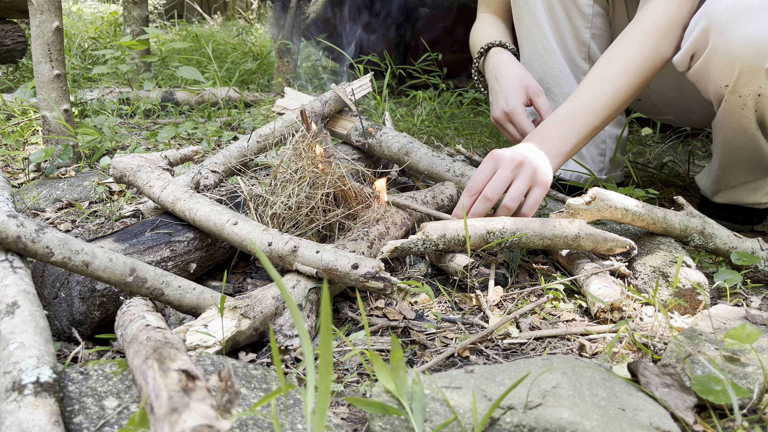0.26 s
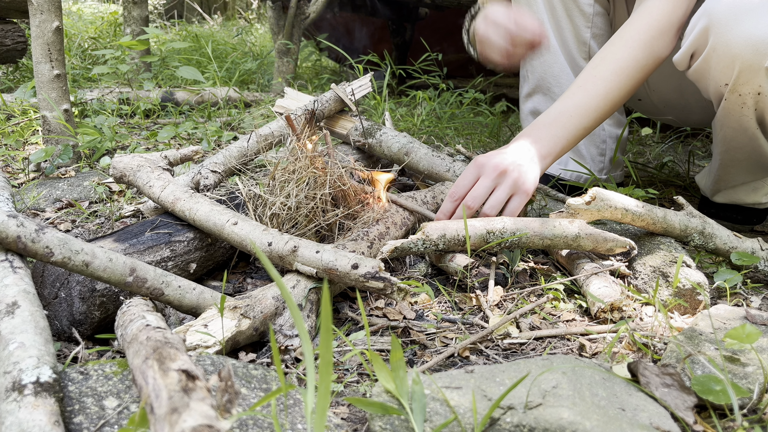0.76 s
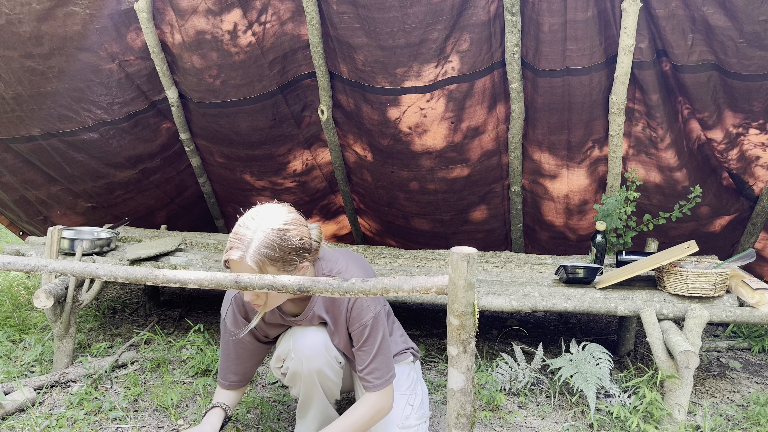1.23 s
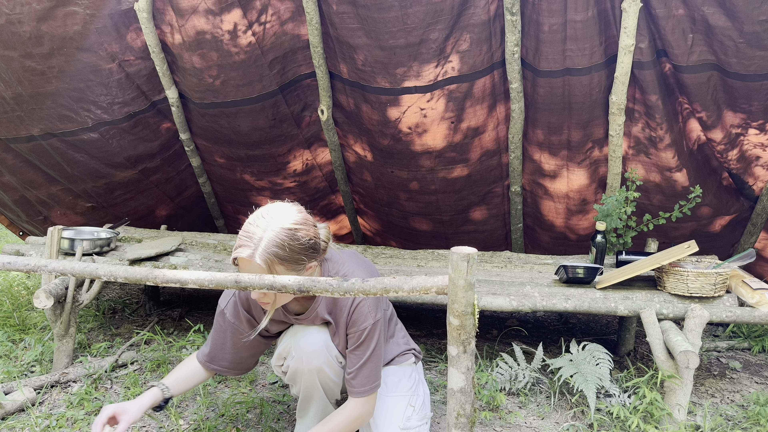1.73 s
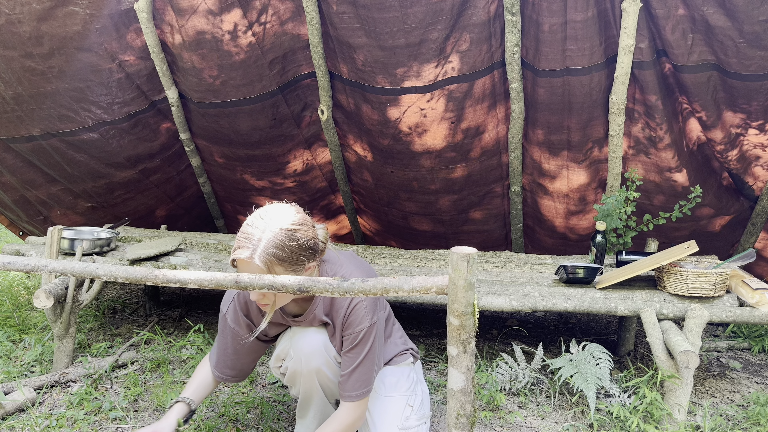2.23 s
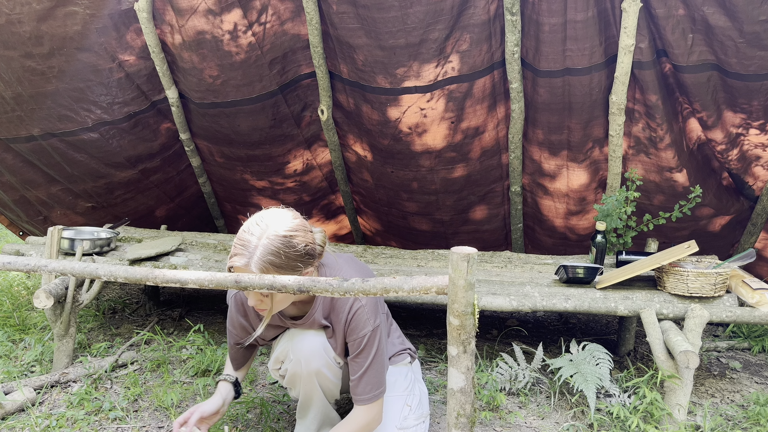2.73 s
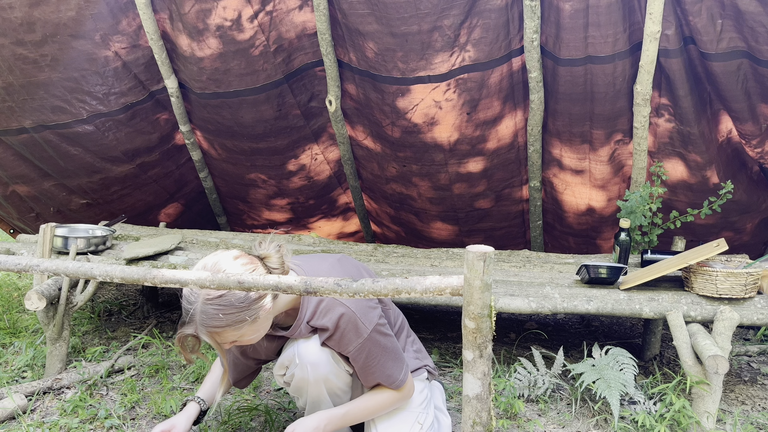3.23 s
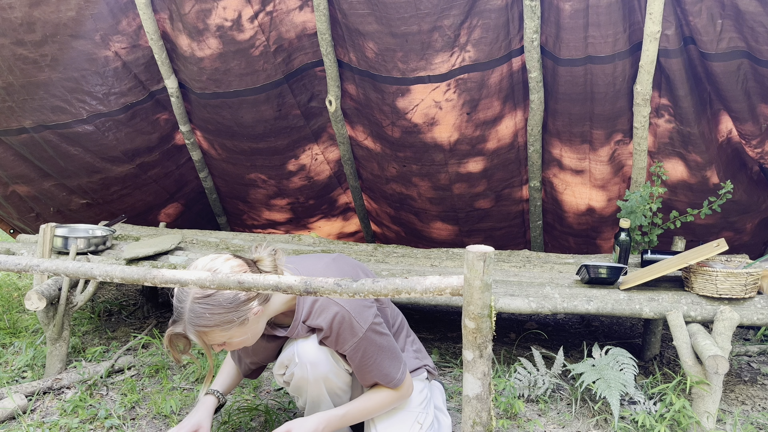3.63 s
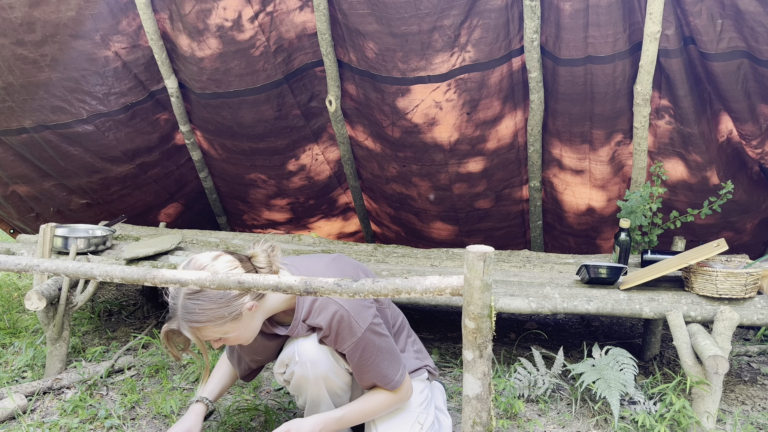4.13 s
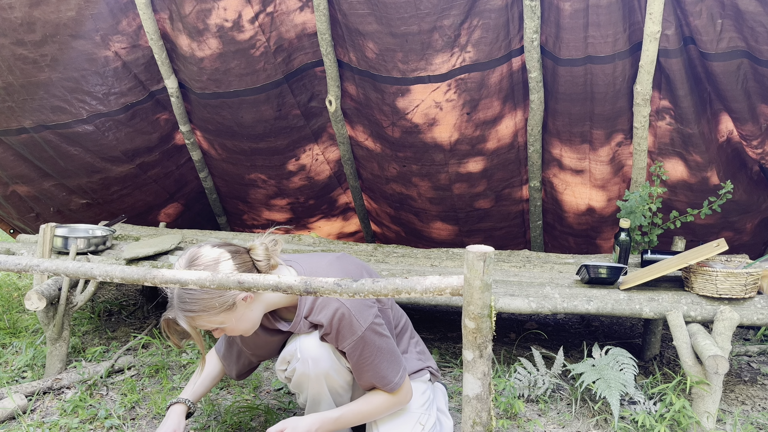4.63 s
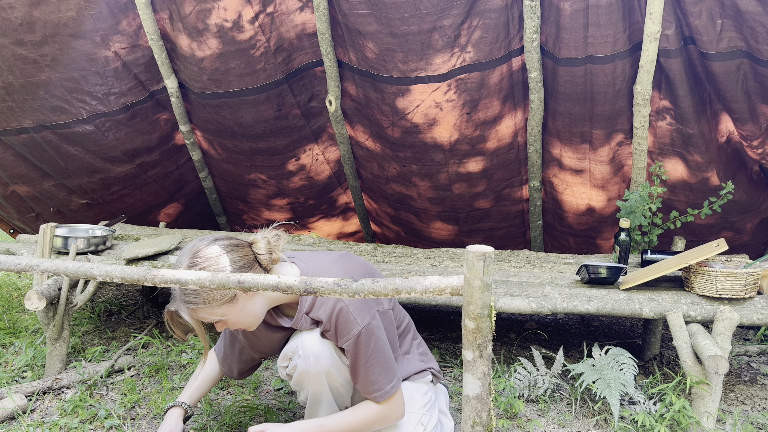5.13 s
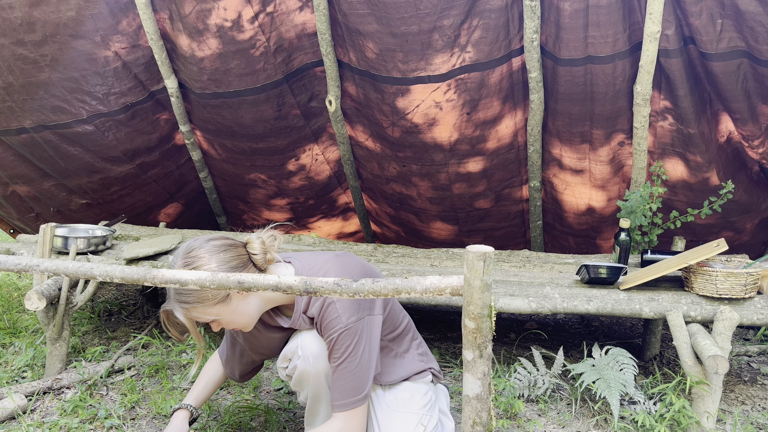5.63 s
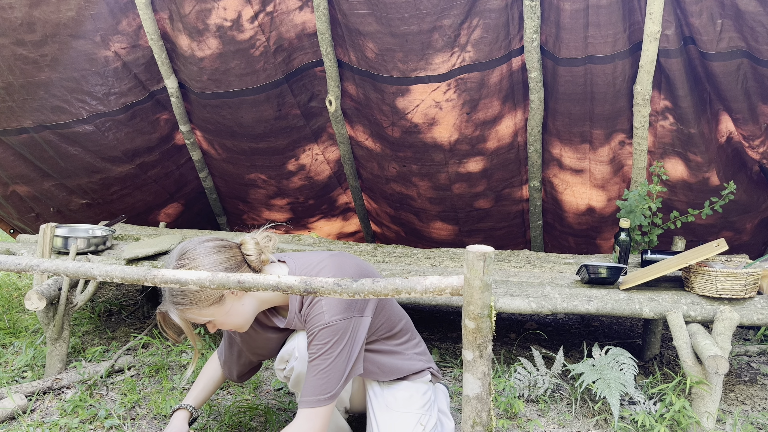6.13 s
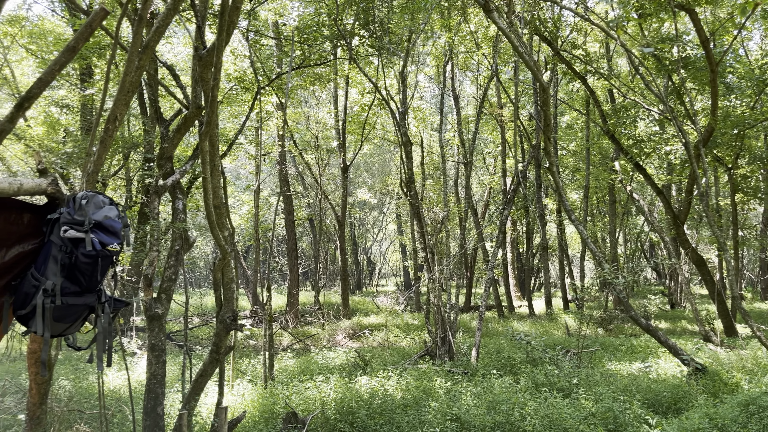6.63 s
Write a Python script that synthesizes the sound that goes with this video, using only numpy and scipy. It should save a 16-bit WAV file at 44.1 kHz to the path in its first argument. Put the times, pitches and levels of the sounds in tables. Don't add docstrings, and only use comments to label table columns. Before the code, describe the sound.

Tiny fire snaps, then a far lorry droning under insects and reverberant birds, a wooden knock near two seconds, and a final lighter knock.

```python
import sys
import numpy as np
from scipy import signal
from scipy.fft import rfft, irfft, next_fast_len
from scipy.io import wavfile
from scipy.ndimage import uniform_filter1d, map_coordinates

SR = 44100
rng = np.random.default_rng(int(sys.argv[2]) if len(sys.argv) > 2 else 0)


def pcm_store(signal):
    levels = np.round(np.clip(np.atleast_2d(signal), -1, 1) * 32767)
    wavfile.write(sys.argv[1], SR, levels.astype(np.int16).T)


def voltage_ratio(level):
    return 10 ** (np.asarray(level, float) / 20)


N = 302967
T = np.arange(N) / SR


def unit(x):
    return x / np.sqrt(np.mean(x ** 2) + 1e-20)


def along(points, hz):
    f, v = np.transpose(points)
    return np.interp(np.log(hz + 1), np.log(f + 1), v)


def curves(rows):
    s, *columns = np.transpose(rows)
    return [np.interp(T, s, c) for c in columns]


def wobble(rate):
    knots = rng.standard_normal(N // 40)
    return map_coordinates(knots, [T * min(rate, SR / 41)], order=2)


def filtered(x, response):
    m = next_fast_len(N + 8192)
    return irfft(rfft(x, m) * response(np.fft.rfftfreq(m, 1 / SR)), m)[..., :N]


# (frequency [Hz], likeness [0-1])
COHERENCE = [(60, 0.97), (250, 0.82), (650, 0.2), (1800, 0.37), (4000, 0.25), (6000, 0.43), (8000, 0.93),
             (15000, 0.82)]


def rush(gain, patchy_db):
    z = signal.stft(rng.standard_normal((2, N)), nperseg=512)[2]
    field = rng.standard_normal(z.shape[1:])
    field = uniform_filter1d(field, size=6, axis=0)
    field = uniform_filter1d(field, size=10, axis=1)
    pair = signal.istft(z * voltage_ratio(patchy_db * unit(field)), nperseg=512)[1][:, :N]

    def mid_side_gain(hz):
        angle = np.arccos(np.clip(along(COHERENCE, hz), 0, 1)) / 2
        return gain(hz) * np.array([np.cos(angle), np.sin(angle)])

    mid, side = filtered(pair, mid_side_gain)
    return unit(np.array([mid + side, mid - side]))


def add(x, s, sound):
    i = round(s * SR)
    part = sound[..., max(-i, 0):N - i]
    x[..., max(i, 0):max(i, 0) + part.shape[-1]] += part


def panned(pan_db):
    return np.array([[pan_db], [-pan_db]]) / 2


# (frequency [Hz], decay time t60 [s])
TREE_DECAY = [(300, 0.29), (3000, 0.93), (7000, 0.68), (14000, 0.27)]


def echo(x, t60_scale):
    hz, t, z = signal.stft(rng.standard_normal((2, SR // 2)), SR, nperseg=256)
    t60 = t60_scale * along(TREE_DECAY, hz)[:, None]
    tail = signal.istft(z * voltage_ratio(-60 * t / t60), SR, nperseg=256)[1]
    return signal.fftconvolve(x[None], tail / np.linalg.norm(tail[0]), axes=1)


def far(x, s, sound, direct, t60_scale):
    add(x, s, direct * sound * np.ones((2, 1)))
    add(x, s + 0.0037, echo(sound, t60_scale))


def tone(hz, db):
    return voltage_ratio(db) * np.sin(2 * np.pi * np.cumsum(hz) / SR)


CUTS = [
    .93,
    3.2,
    6.433,
]
# (rumble [dB], tyre roar [dB], deep throb [dB], engine octave [dB], litter floor [dB])
SHOTS = [
    (-60, -78.5, -65.5, -90, -94),
    (-61, -69.5, -68, -53, -90),
    (-61.5, -69, -66.5, -70, -95.5),
    (-63.5, -68.5, -72, -90, -89.5),
]


def shots():
    return np.array(SHOTS)[np.searchsorted(CUTS, T)].T


# (frequency [Hz], density [dB per Hz])
RUMBLE_SPECTRUM = [(18, -37), (28, -17.5), (45, 0.5), (90, 0.5), (160, -10), (300, -23), (600, -38),
                   (1000, -74.5)]
# (frequency [Hz], density [dB per Hz])
ROAR_SPECTRUM = [(120, -29.5), (300, -1), (700, -0.5), (1200, -6.5), (1700, -17.5), (2500, -27.5),
                 (5000, -37.5)]
# (time [s], firing rate [Hz], level [dB])
LORRY = [(.95, 54.5, -50.5), (1.44, 54.73, -46.5), (2.37, 54.5, -48), (2.56, 54.12, -58),
         (2.78, 54.42, -60), (2.87, 54.24, -46.5), (3.06, 57.2, -60.5), (3.28, 68.86, -59.5),
         (3.66, 77.6, -59.5), (4.0, 77.53, -50), (4.2, 79.5, -57.5), (4.63, 81.3, -52),
         (4.83, 76.75, -45.5), (5.1, 63.04, -43), (5.18, 62.2, -49), (5.26, 62.2, -41), (5.78, 62.3, -43.5),
         (6.42, 63.8, -50.5)]
RUMBLE_GROWS, THROB_GROWS = 0.18, 0.44
OCTAVE_BEAT_HZ, OCTAVE_PEAK_S = 2.129, .97


def road():
    rumble_db, roar_db, deep_db, octave_db, _ = shots()
    hz, db = curves(LORRY)
    rumble_db = rumble_db + 8 + RUMBLE_GROWS * (db + 50) + 1.08 * wobble(3.026)
    roar_db = roar_db + 3.5 + 0.36 * wobble(2.5)
    deep_db = deep_db + THROB_GROWS * (db + 50.5) + 1.2 * wobble(3.3)
    bed = voltage_ratio(rumble_db) * rush(lambda f: voltage_ratio(along(RUMBLE_SPECTRUM, f)), patchy_db=1.08)
    bed += voltage_ratio(roar_db) * rush(lambda f: voltage_ratio(along(ROAR_SPECTRUM, f)), patchy_db=1.72)
    bed += voltage_ratio(deep_db) * rush(lambda f: np.exp(-((f - 48) / 16) ** 2), patchy_db=1.5)
    hz = hz * (1 + 0.0077 * wobble(8))
    heard = (T > CUTS[0]) & (T < CUTS[2])
    beat = np.cos(np.pi * OCTAVE_BEAT_HZ * (T - OCTAVE_PEAK_S))
    firing = tone(hz, db + 3 + 2.0 * wobble(12))
    octave = beat * tone(2 * hz, octave_db + 2.5 + 2.8 * wobble(11))
    return bed + heard * (firing + octave)


# (start [s], end [s], centre [Hz], width [Hz], level [dB], stroke
# rate [pulses per s])
CHOIRS = [
    (0, .93, 8120, 696, -75.5, 60),
    (.93, 6.43, 7500, 697, -83.5, 71),
    (.93, 6.43, 10000, 398, -88, 63),
    (6.43, 7.7, 7680, 451, -77, 36),
    (6.43, 6.87, 10400, 600, -84, 25),
    (6.43, 7.8, 1430, 59.6, -76, 9.9),
    (6.43, 6.87, 2515, 997, -78, 35),
    (2.2, 3.2, 2096, 604, -81.5, 32),
]


def insects():
    out = np.zeros(N)
    for start, end, hz, width, db, rate in CHOIRS:
        phase = 2 * np.pi * hz * T
        wings = wobble(width) * np.sin(phase) + wobble(width) * np.cos(phase)
        strokes = 1 + 0.24 * np.sin(2 * np.pi * rate * T)
        out += ((T >= start) & (T < end)) * voltage_ratio(db) * strokes * wings
    return out * voltage_ratio(1.9 * wobble(2.5))


TRILL = [1.041, 1.184, 1.335, 1.487, 1.635, 1.785, 1.941, 2.083, 2.243, 2.401, 2.552, 2.711, 2.869, 3.037,
         3.198, 3.352, 3.518]
TRILL_END_HZ, TRILL_ABOVE_HZ, TRILL_SINK_S = 2770, 400, 1.1
TRILL_DB, TRILL_CREST_S, TRILL_HALF_S, TRILL_EDGE_DB = -58, 2.3, 1.26, 9
TRILL_FIRST_FALL, TRILL_WARM_S = .25, .25


def trill(out):
    u = np.linspace(0, 1, SR // 45)
    for s in TRILL:
        hz = TRILL_END_HZ + TRILL_ABOVE_HZ * np.exp((TRILL[0] - s) / TRILL_SINK_S)
        db = TRILL_DB - TRILL_EDGE_DB * abs((s - TRILL_CREST_S) / TRILL_HALF_S) ** 3
        fall = min(TRILL_FIRST_FALL + (s - TRILL[0]) / TRILL_WARM_S, 1)
        note = tone(hz * (1 + fall * (.1 - 0.25 * u ** 1.2)), db - 3.0) * np.sin(np.pi * u) ** 0.65
        lead_in = tone(hz * (1.29 - 0.13 * u), db - 15) * np.sin(np.pi * u)
        far(out, s - .006, note, direct=0.61, t60_scale=1.1)
        far(out, s - .06, lead_in, direct=0.18, t60_scale=1.6)


# (time [s], peak level [dB], direct share [ratio], top pitch [Hz])
CHIPS = [
    (1.393, -64.5, 0.2, 7550),
    (1.778, -67, 0.48, 7800),
    (2.53, -67, 0.32, 7700),
    (3.316, -62.5, .12, 7540),
    (5.16, -63, .08, 7630),
    (5.335, -59.5, 1.48, 7860),
]


def chips(out):
    u = np.linspace(0, 1, SR // 45)
    for s, db, direct, top_hz in CHIPS:
        hz = 5400 + (top_hz - 5400) * u ** .45
        chip = tone(hz, db - 0.5) * np.sin(np.pi * u ** 0.65) ** 0.71
        far(out, s - .003, chip, np.clip(direct, 0, 3), t60_scale=1.0)


# (time [s], level [dB])
BUZZES = [
    (-.13, -74),
    (2.775, -67),
    (4.713, -69),
    (5.87, -68),
]
# (delay [s], length [s], start pitch [Hz], end pitch [Hz], level [dB])
BUZZ_PARTS = [
    (.04, .09, 3450, 3080, -1),
    (.06, .1, 4400, 3800, -2),
    (.09, .07, 5500, 5000, -13),
    (.14, .08, 4900, 4500, -6),
]
WHISTLE_HZ, WHISTLE_END_HZ, WHISTLE_SINK_S, WHISTLE_S = 3530, 3370, .06, .16
WHISTLE_FADE_DB_PER_S, RELEASE_DB_PER_S, WARBLE_HZ = 25, 650, 200


def buzzes(out):
    t = np.arange(SR // 4) / SR
    warble = np.sin(2 * np.pi * 95 * t)
    release_db = WHISTLE_FADE_DB_PER_S * t + RELEASE_DB_PER_S * np.maximum(t - WHISTLE_S, 0)
    whistle_hz = WHISTLE_END_HZ + (WHISTLE_HZ - WHISTLE_END_HZ) * np.exp(-(t / WHISTLE_SINK_S) ** 2)
    for s, db in BUZZES:
        call = tone(whistle_hz + 45 * warble, db - release_db) * np.minimum(t / 0.0048, 1)
        for after, length, from_hz, to_hz, part_db in BUZZ_PARTS:
            v = np.clip((t - after) / length, 0, 1)
            hz = from_hz + (to_hz - from_hz) * v ** .6 + WARBLE_HZ * warble
            call = call + tone(hz, db + part_db) * abs(np.sin(np.pi * v)) ** .7
        far(out, s, call, direct=0.4, t60_scale=0.9)


# (time [s], length [s], pitch [Hz], echo level [dB], direct share [ratio])
NOTES = [
    (2.322, .075, 1900, -74, .7),
    (2.1025, 0.0037, 8900, -60.5, 7.4),
]


def single_notes(out):
    for s, length, hz, db, direct in NOTES:
        t = np.arange(0, length, 1 / SR)
        note = tone(np.full(len(t), hz), db) * np.sin(np.pi * t / length)
        far(out, s, note, direct, t60_scale=0.24)


def birds():
    out = np.zeros((2, N))
    trill(out)
    chips(out)
    buzzes(out)
    single_notes(out)
    return voltage_ratio(panned(3)) * out


# (frequency [Hz], density [dB per Hz])
RUSTLE_SPECTRUM = [(700, -30), (1500, 3), (3000, 0), (4500, 0), (6500, -3.5), (8500, -4), (12000, -10.5)]
# (frequency [Hz], density [dB per Hz])
CRISP_SPECTRUM = [(5000, -37), (8000, -4.5), (9500, 1), (11000, -3.5), (13000, 2), (15000, -1.5),
                  (15800, -8)]
# (time [s], level [dB])
BREEZE = [(0, -80), (.42, -85), (.57, -81.5), (.85, -88), (1.0, -78), (1.3, -82.5), (1.8, -82),
          (2.3, -74.5), (2.85, -78.5), (3.0, -85.5), (3.42, -77), (3.9, -78.5), (4.3, -75), (4.85, -75.5),
          (5.03, -81.5), (5.55, -78.5), (6.47, -78.5), (6.72, -89.5)]
# (time of crest [s], length [s], level [dB], crisp part over it [dB])
STIRS = [(.02, 0.17, -90.5, 5), (0.345, .03, -85.5, 3), (0.568, 0.11, -88.5, 7), (0.746, 0.038, -86, 0),
         (.86, 0.045, -89.5, 0), (1.027, 0.091, -85, 2), (1.42, 0.16, -81.5, 6), (1.58, 0.093, -77, 6.5),
         (1.798, 0.22, -83.5, -5), (2.03, 0.068, -81.5, 0), (2.1, .025, -69.5, 1), (2.15, .09, -80, 1),
         (2.849, .06, -80, 0), (3.16, 0.055, -87, 6), (3.233, 0.035, -94, 1.5), (4.121, .08, -82, 4),
         (4.248, 0.089, -83, 1), (4.364, 0.15, -81, 0), (4.598, 0.16, -82, 3), (4.951, .08, -98, 8),
         (5.36, 0.12, -94, 7), (5.93, .15, -89, 3), (6.27, .06, -90, 4), (6.36, .1, -90.5, 7),
         (6.49, .06, -91, 9), (6.753, .03, -80, -8), (6.85, .1, -94, 6)]
STIR_RISE, STIR_EDGE_DB = 0.73, 12.5


def leaves():
    s, length, db, crisp_db = np.transpose(STIRS)[..., None]
    t = np.arange(0, N / SR, .001)
    distance = np.maximum((t - s) / length, (s - t) / (STIR_RISE * length))
    power = voltage_ratio(2 * (db - STIR_EDGE_DB * distance ** 1.34))
    crush = wobble(25)
    rustle_grain = voltage_ratio(0.49 * crush + 1.2 * wobble(150))
    crisp_grain = voltage_ratio(1.68 * crush + 1.2 * wobble(150))
    rustle = unit(rustle_grain * rush(lambda f: voltage_ratio(along(RUSTLE_SPECTRUM, f)), patchy_db=2.0))
    crisp = unit(crisp_grain * rush(lambda f: voltage_ratio(along(CRISP_SPECTRUM, f)), patchy_db=-0.1))
    stir_power = np.interp(T, t, power.sum(0))
    crisp_power = np.interp(T, t, (voltage_ratio(2 * crisp_db) * power).sum(0))
    rustle_gain = np.sqrt(voltage_ratio(2 * shots()[-1]) + stir_power)
    crisp_gain = np.sqrt(voltage_ratio(2 * curves(BREEZE)[0]) + crisp_power)
    return voltage_ratio(11.5) * rustle_gain * rustle + voltage_ratio(6.5) * crisp_gain * crisp


# (time [s], peak [dB], middle part [dB], low part [dB], left over right [dB])
SNAPS = [(0.146, -64, -28, -25, 8), (0.3474, -52, -13, -18, 2), (2.853, -68, 2, 8, 5),
         (0.665, -55, -14, -20, 0.0), (0.691, -52.5, -20, -26.5, -1.0), (0.7414, -54.5, -4, -28, -1.0),
         (0.8514, -64, -14, -12, 6), (0.8581, -61, -18, -20, -3), (0.989, -56.5, -14, -28, 6),
         (1.5677, -54, -13, -11, 6), (1.589, -41.5, -26, -26, -6), (2.0296, -60, -6, -5, 7),
         (2.102, -60, -13, -6, -1), (2.6902, -61, -14, 6, 5), (2.8373, -63, -3, 12, 4),
         (3.7698, -66, -16, -12, 3), (4.229, -59, -8, -13, -8), (4.2594, -62, -11, -28, 6),
         (4.6054, -51, -21, -16.5, -3), (4.6422, -54, -18, -16, 3), (4.853, -49, -30, -30, 1),
         (4.999, -56, -28, -21, 8), (5.5316, -61, -31, -24.5, -1.5), (6.7502, -55, -18, 3, 8)]
TICKS = [.5462, 3.911, 3.98, 5.6465, 5.8371]
TICK_DB, TICK_DULL_DB = -65, -24


def snaps():
    out, t = np.zeros((2, N)), np.arange(SR // 25) / SR
    edges_hz = [8000, 15700], [3200, 6500], [1100, 3200]
    bands = [signal.butter(3, edges, "band", fs=SR) for edges in edges_hz]
    ticks = [(s, TICK_DB, TICK_DULL_DB, TICK_DULL_DB, 0) for s in TICKS]
    t60 = np.array([[.007], [.012], [.03]])
    dying = voltage_ratio(-60 * t / t60) + voltage_ratio(-20.5 - 60 * t / 0.055)
    for s, db, middle_db, low_db, pan_db in list(SNAPS) + ticks:
        burst = dying * rng.standard_normal(dying.shape)
        crack = np.zeros(len(t))
        for band, noise, level in zip(bands, burst, (db, db + middle_db, db + low_db)):
            part = signal.lfilter(*band, noise)
            crack += voltage_ratio(level) * part / abs(part).max()
        add(out, s, voltage_ratio(5.0 + panned(pan_db)) * crack)
    return out


# (time [s], level [dB], weight corner [Hz], hardness corner [Hz], left over right [dB])
KNOCKS = [
    (.96, -42, 120, 480, 2),
    (2.092, -31.5, 120, 2300, 2),
    (6.7475, -42, 1050, 2300, 3),
]
# (frequency [Hz], level [dB], decay time t60 [s])
STICK_MODES = [(149, -7, 0.052), (272.6, -1, 0.039), (468, -4, 0.038), (624, -1, 0.031), (900, 4, 0.024),
               (1160, 3, 0.036), (1675, 5, .028), (2045, 1, 0.017), (3060, -7, 0.017)]
DAMPED = .85


def knocks():
    out, t = np.zeros((2, N)), np.arange(SR // 10) / SR
    bounces = [(-.002, -14), (0, -8), (.0025, 0), (.005, -5), (.012, -4.5)]  # (lag [s], level [dB])
    for s, db, weight_hz, hard_hz, pan_db in KNOCKS:
        hit = np.zeros(SR // 8)
        for lag, bounce_db in bounces:
            ring = np.zeros(len(t))
            for hz, level, t60 in STICK_MODES:
                ring += voltage_ratio(level - 60 * t / (DAMPED * t60)) * np.sin(2 * np.pi * (hz * t + rng.random()))
            clatter = 2.2 * voltage_ratio(-60 * t / 0.019) * rng.standard_normal(len(t))
            onset = np.minimum(t / 0.00075, 1)
            add(hit, lag + .002, voltage_ratio(bounce_db) * onset * (ring + clatter))
        band = signal.butter(2, [weight_hz, hard_hz], "band", fs=SR)
        hit = signal.lfilter(*band, hit) + voltage_ratio(-22.0) * hit * hard_hz / 2300
        hit = hit / np.linalg.norm(hit) * 8
        add(out, s - .002, voltage_ratio(db + panned(pan_db)) * hit)
        add(out, s + 0.0034, voltage_ratio(db - 16) * echo(hit, t60_scale=0.27))
    return out


def scene():
    return road() + insects() + birds() + leaves() + snaps() + knocks()


def joint(x, sum_db, difference_db, faint_db):
    mid_side = np.array([x[0] + x[1], x[0] - x[1]]) / 2
    hz, _, z = signal.stft(mid_side, SR, nperseg=2048)
    power = np.abs(uniform_filter1d(np.abs(z) ** 2, size=20, axis=1))
    limit = voltage_ratio([[[2 * sum_db]], [[2 * difference_db]]])
    weak = (power < power[::-1] * limit) & (hz > 7000)[:, None]
    masked = weak & (power < voltage_ratio(2 * faint_db))
    mid, side = signal.istft(z * ~masked, SR, nperseg=2048)[1][:, :N]
    return np.array([mid + side, mid - side])


# (frequency [Hz], phase [rad])
CAMP_PHASE = [(0, 0), (700, .8), (1500, 2.8), (1900, .3), (2900, 1.1), (4800, .8), (8600, -3.14),
              (22050, -15.75)]
# (frequency [Hz], phase [rad])
WOOD_PHASE = [(0, 0), (450, 0), (1300, -4.3), (2600, -3.5), (3500, -.3), (4800, .2), (8900, 6.28),
              (22050, 18.1)]


def ports(x, phase):
    sides = np.array([[1], [-1]])
    return filtered(x, lambda hz: np.exp(.5j * np.interp(hz, *np.transpose(phase)) * sides))


def band_limit(x):
    return signal.sosfilt(signal.butter(12, 15810, fs=SR, output="sos"), x)


def record(dry):
    x = np.where(T < CUTS[2], ports(dry, CAMP_PHASE), ports(dry, WOOD_PHASE))
    x = joint(x, sum_db=-6, difference_db=-2.5, faint_db=-104) * voltage_ratio(panned(.7))
    fade = np.prod([np.clip(abs(T - s) / 0.035, .06, 1) for s in CUTS], axis=0)
    return band_limit(x * fade)


dry = scene()
out = record(dry)
pcm_store(out)
```